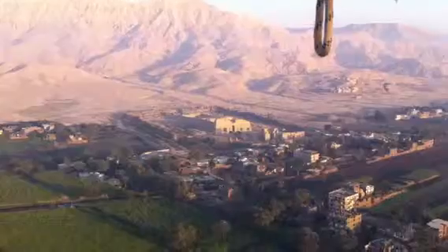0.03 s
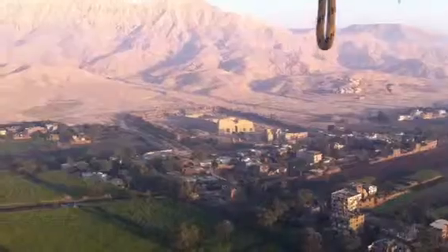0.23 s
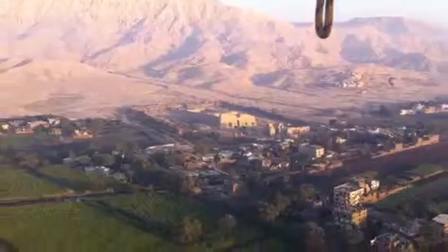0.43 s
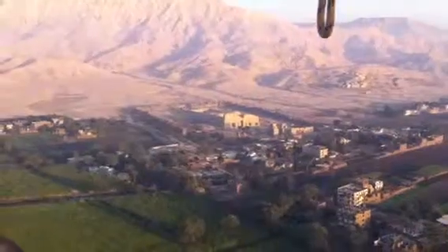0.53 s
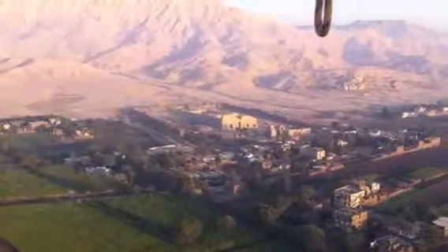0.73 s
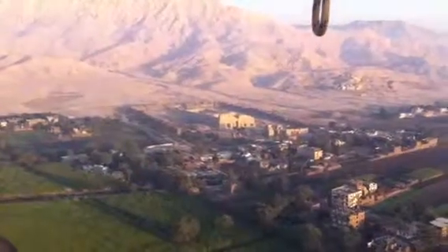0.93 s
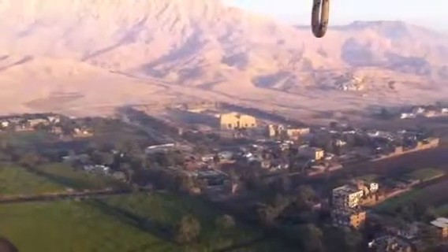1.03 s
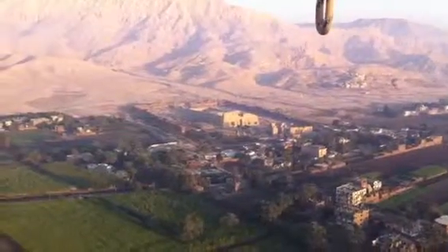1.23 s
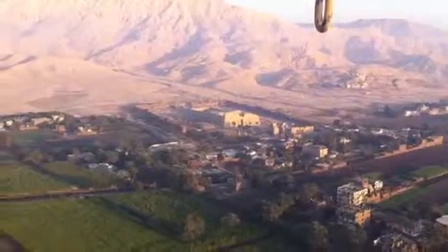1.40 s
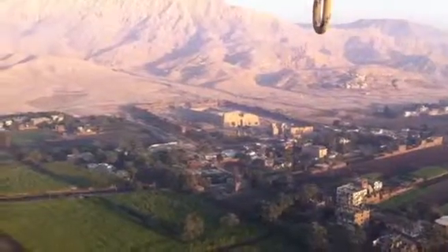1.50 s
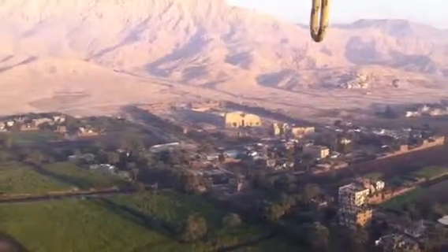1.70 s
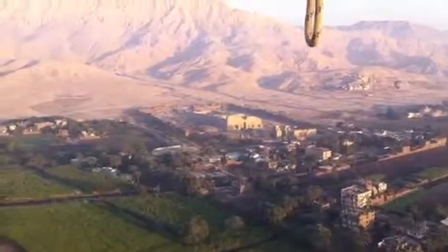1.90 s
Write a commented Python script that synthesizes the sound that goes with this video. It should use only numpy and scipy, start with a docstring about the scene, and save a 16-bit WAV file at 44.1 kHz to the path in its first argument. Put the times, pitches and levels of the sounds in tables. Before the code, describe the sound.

A gas burner roars at full blast above a balloon basket, then shuts off and dies away

```python
"""A gas burner roars above a balloon basket, heard by a mono microphone.
After a short silence the sound comes in at full blast: gas pockets burn in dense puffs, filtered noise
of random impulses, over the broadband hiss of the jet. Low bursts and one deep thud stand out.
The valve closes, the hiss dulls and dies first, and the flame sinks away beneath faint thin sine tones."""
import sys
import numpy as np
from scipy import signal
from scipy.fft import rfft, irfft
from scipy.io import wavfile
from scipy.ndimage import uniform_filter1d

SR = 44100
rng = np.random.default_rng(int(sys.argv[2]) if len(sys.argv) > 2 else 0)


def digitize_waveform(pressure):
    """Quantize a signal to 16-bit integers and store it at the path in sys.argv[1].

    Rows of a 2-D input are taken as channels; values are limited to [-1, 1].
    """
    field = np.atleast_2d(pressure).T
    bounded = np.clip(field, -1, 1)
    quanta = np.round(bounded * 32767).astype(np.int16)
    wavfile.write(sys.argv[1], SR, quanta)


N = 85995  # samples


def undb(db):
    """Logarithmic level: 20 dB are a factor of ten in amplitude."""
    return 10 ** (np.asarray(db) / 20)


def colour(x, table):
    """Spectral shaping: weight each frequency by (Hz, dB) points on a log axis, then scale to rms 1."""
    hz, db = np.array(table).T
    freq = np.maximum(np.arange(N // 2 + 1) * SR / N, 1)
    gain_db = np.interp(np.log(freq), np.log(hz), db, left=-120, right=-120)
    y = irfft(rfft(x) * undb(gain_db), N)
    return y / np.sqrt(np.mean(y ** 2))


def walk(rate):
    """Slow random modulation: levels held for 1 / rate s, smoothed twice, with standard deviation 1."""
    hold = int(SR / rate)
    steps = np.repeat(rng.standard_normal(N // 50), hold)[:N + hold]
    y = uniform_filter1d(uniform_filter1d(steps, hold), hold)[:N]
    return y / np.std(y)


def puffs(rate, spread_db):
    """Shot noise: pressure kicks of random sign and size at random instants, rate per second."""
    hit = rng.random(N) < rate / SR
    return hit * rng.standard_normal(N) * undb(spread_db * rng.exponential(size=N))


def curve(t, column):
    """Envelope: the amplitude of one layer, interpolated in dB between the moments of the burn."""
    # Each row: time in seconds, then the levels in dB of the flame's rumble, the flame's crackle,
    # the lower jet hiss and the upper jet hiss.
    burn = [(0.135, -17.5, -22.5, -29, -24), (0.209, -24, -22, -30.5, -23.5),
            (0.523, -16.5, -22, -28, -23.5), (0.615, -23.5, -23.5, -29, -23),
            (0.685, -20.5, -20.5, -28, -23), (0.715, -14, -21, -28.5, -24.5), (0.827, -21, -20, -30, -24),
            (0.887, -16.5, -24.5, -32, -28), (0.957, -25, -23, -33.5, -30.5),
            (1.043, -17.5, -23.5, -33, -31), (1.069, -16.5, -20, -34, -30.5),
            (1.119, -19.5, -23.5, -33, -30), (1.377, -22, -23, -34.5, -33), (1.427, -19, -23, -34, -33),
            (1.543, -25.5, -26.5, -37, -37), (1.615, -23, -30.5, -41, -43), (1.807, -45, -44, -54, -61.5),
            (1.95, -43.5, -49.5, -58, -65.5)]
    rows = np.array(burn)
    return undb(np.interp(t, rows[:, 0], rows[:, column]))


def flame(t):
    """Combustion noise: igniting gas pockets act as impulses that excite deep bass, rumble and crackle."""
    # Spectrum of the deep bass. Each row: frequency in Hz, relative level in dB per Hz.
    deep_spectrum = [(18, -68), (30, -38), (43, -33), (75, -23), (111, -6.5), (129, 1.5), (155, 3),
                     (190, -1), (250, -32), (420, -120)]
    # Course of the deep bass. Each row: time in seconds, level in dB.
    bass_level = [(.135, -28.5), (.3, -23), (.5, -20.5), (.8, -25.5), (.95, -31.5), (1.4, -26.5),
                  (1.6, -31), (1.8, -38.5), (1.95, -61)]
    # Spectrum of the rumble. Each row: frequency in Hz, relative level in dB per Hz.
    rumble_spectrum = [(110, -49), (180, -7), (243, 2.5), (324, -5.5), (362, -7), (440, -13), (570, -26),
                       (970, -120)]
    # Spectrum of the crackle. Each row: frequency in Hz, relative level in dB per Hz.
    crackle_spectrum = [(240, -15), (400, -5.5), (440, -10.5), (484, -0.5), (544, -0.5), (724, -3),
                        (832, -11), (977, -5.5), (1150, -11.5), (1380, -10), (1740, -14.5), (2300, -35),
                        (2990, -30), (5060, -120)]

    surge = walk(18)  # shared flicker: the lows dip slightly as the crackle rises
    kicks = puffs(2500, spread_db=1.57)
    bass = colour(kicks, deep_spectrum) * undb(np.interp(t, *np.array(bass_level).T))
    rumble = colour(kicks, rumble_spectrum) * curve(t, column=1)

    crackle = colour(puffs(5000, spread_db=0.5), crackle_spectrum) * curve(t, column=2)
    crackle_flicker = undb(0.31 * surge + 0.23 * walk(31.3))
    return (bass + rumble) * undb(-0.5 * surge) + crackle * crackle_flicker


def flares(t):
    """Sudden heat release: a large pocket burning at once gives a short windowed sine; one thud is a pulse."""
    # Strongest flare-ups. Each row: start in seconds, peak level in dB before the high-pass, pitch in Hz.
    flare_ups = [(0.348, -8, 207), (0.445, -14, 134), (0.499, -13, 241), (0.556, -22, 299),
                 (0.707, -19, 122), (0.709, -13, 240), (0.84, -8, 207), (0.875, -7, 216), (0.98, -18, 218),
                 (1.025, -9, 210), (1.593, -27, 238)]
    cycles, low_cut_hz = 2.55, 130
    bursts = 0
    for start_s, db, hz in flare_ups:
        progress = (t - start_s) * hz / cycles
        window = np.sin(np.pi * np.clip(progress, 0, 1)) ** 2
        bursts = bursts + undb(db) * window * np.sin(2 * np.pi * hz * (t - start_s))
    high_pass = signal.butter(4, low_cut_hz, "high", fs=SR, output="sos")
    bursts = signal.sosfilt(high_pass, bursts)

    # the thud: a pull, then a push that the bias makes stronger
    thud_s, width_s, bias = .8838, 0.0012, 0.2
    x = (t - thud_s) / width_s
    thud = undb(-12) * (2 * x + bias) * np.exp(-x ** 2)
    return bursts + thud


def jet(t):
    """Turbulent jet noise: gas rushing from the nozzle hisses in two ranges and dulls as pressure drops."""
    # Spectrum of the lower hiss. Each row: frequency in Hz, relative level in dB per Hz.
    jet_spectrum = [(1240, -6), (2100, 0), (2280, -3), (2690, -3), (3100, -2), (4130, -3.5), (4920, 0),
                    (5690, -3.5), (6300, -8.5), (8190, -19), (13900, -120)]
    # Spectrum of the upper hiss, valve open. Each row: frequency in Hz, relative level in dB per Hz.
    open_spectrum = [(3590, -34), (6100, -4), (8610, -7.5), (11100, -3), (12400, -3), (14100, -3),
                     (15200, -3), (15700, -10)]
    # Spectrum of the upper hiss, valve shut. Each row: frequency in Hz, relative level in dB per Hz.
    closing_spectrum = [(3590, -31), (6100, 0.5), (8300, -5), (9130, -6), (12000, -3.5), (14100, -5),
                        (15700, -10)]

    flutter = walk(12.87)  # shared by both ranges
    gas = rng.standard_normal(N)
    low = colour(puffs(12000, spread_db=-0.5), jet_spectrum) * curve(t, column=3)
    low_flutter = undb(.35 * flutter + .5 * walk(60.6))

    closing_s, closing_length_s = 1.42, .3
    shut = np.clip((t - closing_s) / closing_length_s, 0, 1)
    high = (1 - shut) * colour(gas, open_spectrum) + shut * colour(gas, closing_spectrum)
    high_flutter = undb(0.42 * flutter + .5 * walk(59.8))
    return low * low_flutter + high * high_flutter * curve(t, column=4)


def tones(t):
    """Resonance: steady sines swell and fade as the flame dies, perhaps the hot coil singing."""
    # Each row: frequency in Hz, rms level over the swell in dB.
    thin_tones = [(2401, -63), (2708, -68), (3165, -68), (5443, -69)]
    start_s, length_s = 1.815, 0.088
    swell = np.sin(np.pi * np.clip((t - start_s) / length_s, 0, 1))
    total = 0
    for hz, db in thin_tones:
        phase = rng.random()  # in cycles
        # the factor 2 offsets the rms of the sine and of the swell
        total = total + 2 * undb(db) * np.sin(2 * np.pi * (hz * t + phase))
    return swell * total


def scene():
    """Superposition: the sources add as pressures behind one steep onset, alike in both channels."""
    t = np.arange(N) / SR
    start_s, attack_s = .1203, 0.0018
    onset = np.clip((t - start_s) / attack_s, 0, 1)
    mono = (flame(t) + flares(t) + jet(t) + tones(t)) * onset
    return np.array([mono, mono])


def record(dry):
    """Saturation and band limit: the microphone rounds the loudest peaks and cuts the top steeply."""
    squeeze, top_hz = 1.02, 15800
    soft = np.tanh(squeeze * dry) / squeeze
    low_pass = signal.ellip(10, .2, 90, top_hz, fs=SR, output="sos")  # ripple and rejection in dB
    return signal.sosfilt(low_pass, soft)


dry = scene()
out = record(dry)
digitize_waveform(out)
```